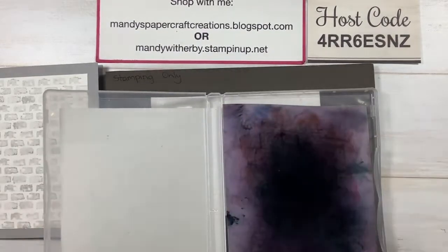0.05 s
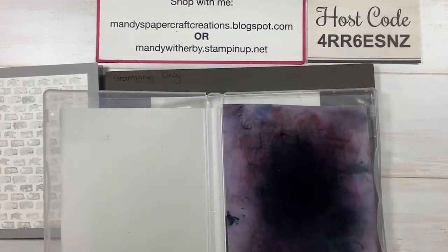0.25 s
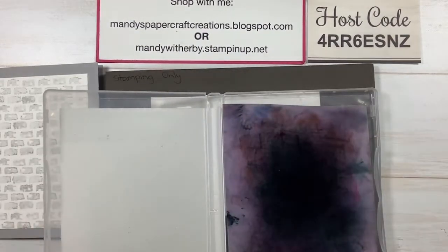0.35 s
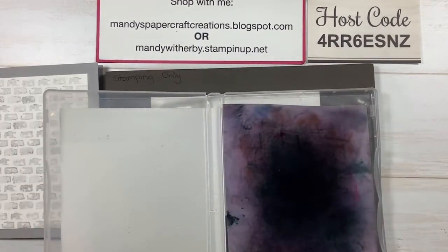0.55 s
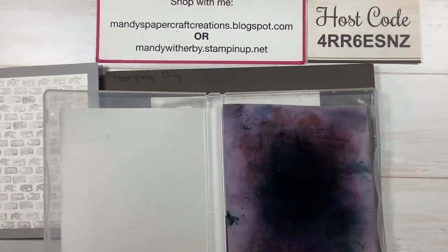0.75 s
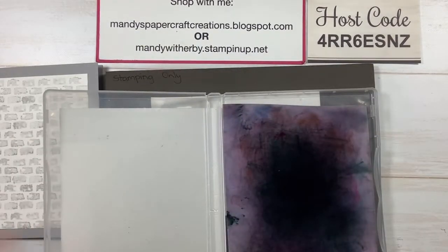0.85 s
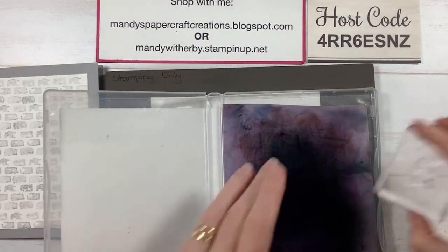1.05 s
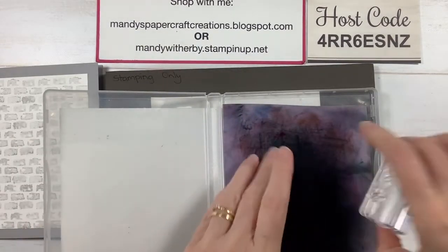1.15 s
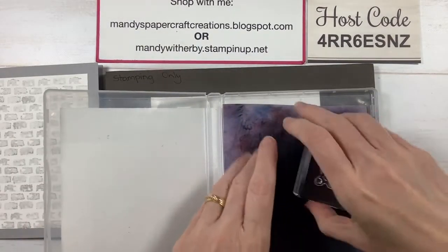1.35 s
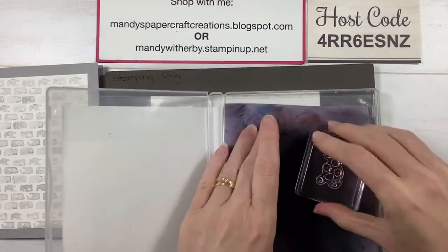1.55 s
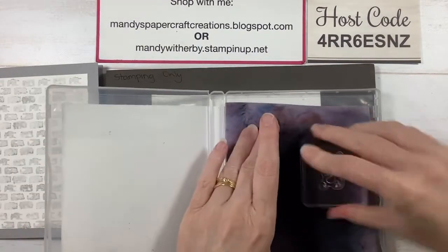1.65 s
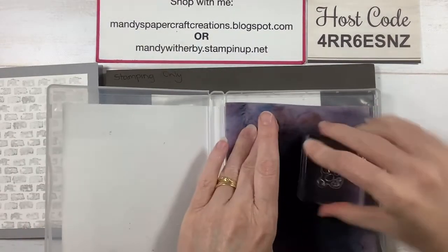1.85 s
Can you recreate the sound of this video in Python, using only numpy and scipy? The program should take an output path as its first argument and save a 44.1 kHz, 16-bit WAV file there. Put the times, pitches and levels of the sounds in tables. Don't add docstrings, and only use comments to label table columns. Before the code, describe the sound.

A hard plastic block clacks down on a paper-covered desk: a light tap, a loud quick double clack, then a soft padded thump. Faint handling ticks follow in a small, quiet room, heard close over low hum.

```python
import sys
import numpy as np
from scipy import signal
from scipy.fft import rfft, irfft
from scipy.io import wavfile
from scipy.ndimage import uniform_filter1d

SR = 44100
rng = np.random.default_rng(int(sys.argv[2]) if len(sys.argv) > 2 else 0)


def digitize_waveform(pressure):
    field = np.atleast_2d(pressure).T
    bounded = np.clip(field, -1, 1)
    quanta = np.round(bounded * 32767).astype(np.int16)
    wavfile.write(sys.argv[1], SR, quanta)


def rack_gain(trim_db):
    fader = np.asarray(trim_db, float)
    return 10 ** (fader / 20)


N = 83790

# (time [s], clack level [dB], desk level [dB])
BLOCK_LANDINGS = [
    (0.3787, -12.5, -31.5),
    (0.3962, -6.5, -35),
]
# (time [s], clack level [dB], desk level [dB])
STAMP_LANDINGS = [
    (0.2137, -24, -31),
    (0.262, -36, -37),
]
# (time [s], push level [dB], desk level [dB])
PADDED_LANDINGS = [
    (0.279, -66, -53.5),
    (0.5169, -10, -26.5),
    (0.5667, -34.5, -39),
    (1.529, -72, -60.5),
]


def rms_one(x):
    return x / np.sqrt(np.mean(x ** 2) + 1e-20)


def band(x, low_hz, high_hz, order=2):
    edges_hz = [max(low_hz, 10), min(high_hz, 0.45 * SR)]
    return signal.sosfilt(signal.butter(order, edges_hz, "band", fs=SR, output="sos"), x)


def ring(clicks, hz, t60_s):
    r = rack_gain(-60 / (t60_s * SR))
    w = 2 * np.pi * hz / SR
    return signal.lfilter([0, np.sin(w)], [1, -2 * r * np.cos(w), r * r], clicks + 1e-18)


def strike(s, db, modes, spread_db):
    s, db = np.asarray(s), np.asarray(db)
    at = np.clip((s * SR).astype(int), 0, N - 1)
    chance = rng.standard_normal((len(s), len(modes)))
    out = np.zeros(N)
    for k, (hz, level_db, t60_s) in enumerate(modes):
        clicks = np.zeros(N)
        sign = (-1) ** k
        np.add.at(clicks, at, sign * rack_gain(db + level_db + spread_db * chance[:, k]))
        out += ring(clicks, hz, t60_s)
    return out


def burst(s, db, low_hz, high_hz, t60_s):
    t = np.arange(N) / SR - s
    decay = rack_gain(-60 * np.maximum(t, 0) / t60_s) * (t > 0)
    puff = band(rng.standard_normal(N) * decay, low_hz, high_hz, order=3)
    return rack_gain(db) * puff * np.sqrt(SR / 2 / (high_hz - low_hz))


def hum():
    # (frequency [Hz], density [dB per Hz])
    spectrum = [(12, -35), (20, -15), (144, -3.5), (191, -9), (519, -12.5), (788, -38.5), (857, -30.5),
                (11700, -46.5), (15500, -50.5)]
    # (centre [Hz], width [Hz], level [dB])
    drones = [(61.3, 22, -65), (121, 6.7, -67.5)]
    level_db, hiss_top_hz = -64, 14300
    hz = np.maximum(np.fft.rfftfreq(N, 1 / SR), 1)
    at_hz, density_db = np.transpose(spectrum)
    shape = rack_gain(np.interp(np.log(hz), np.log(at_hz), density_db)) / (1 + (hz / hiss_top_hz) ** 30)
    out = rack_gain(level_db) * rms_one(irfft(rfft(rng.standard_normal(N)) * shape, N))
    for centre_hz, width_hz, db in drones:
        shape = 1 / (1 + (2 * (hz - centre_hz) / width_hz) ** 2)
        out += rack_gain(db) * rms_one(irfft(rfft(rng.standard_normal(N)) * shape, N))
    return out


def room(x):
    # (frequency [Hz], t60 [s], level [dB])
    reverb = [(102.7, 0.15, -16.5), (402, 0.34, -14), (1200, 0.44, -15.5), (3000, 0.34, -16.5),
              (5500, 0.3, -14), (8000, 0.14, -16.5), (14000, .14, -26.5)]
    gap_s, build_s = 0.0043, 0.004
    t = np.arange(SR // 2) / SR
    at_hz, t60_s, db = np.transpose(reverb)
    edges_hz = 60 * 2 ** np.arange(0, 8.1, 0.5)
    tail = 0
    for low_hz, high_hz in zip(edges_hz, edges_hz[1:]):
        place = np.log(low_hz * high_hz) / 2
        start_db = np.interp(place, np.log(at_hz), db)
        gain_db = start_db - 60 * t / np.interp(place, np.log(at_hz), t60_s)
        tail = tail + rack_gain(gain_db) * band(rng.standard_normal(len(t)), low_hz, high_hz)
    tail = tail * np.clip((t - gap_s) / build_s, 0, 1) * rack_gain(-20.0)
    return signal.fftconvolve(x, tail)[:N]


def brushes():
    # (time [s], length [s], level [dB], centre [Hz], width [octaves])
    strokes = [(0.0, 0.2, -67.5, 295, 0.86), (0.725, 0.089, -69, 330, .6), (0.757, 0.046, -69.5, 2200, 2.1),
               (.74, 0.2, -64.5, 125, 0.21), (0.388, .022, -73, 13500, 0.46),
               (1.754, 0.023, -87, 15390, .06), (0.75, 0.017, -73.5, 11440, 0.78),
               (0.751, 0.012, -56, 3700, 1.32), (0.753, 0.036, -61.5, 1200, 0.74),
               (0.763, 0.045, -75, 3180, 0.47), (0.815, 0.067, -81.5, 1226, 0.14),
               (1.006, 0.063, -81.5, 14000, .4), (1.324, 0.41, -79.5, 800, 0.8),
               (1.464, 0.26, -60, 132.5, 0.09), (1.52, 0.063, -69.5, 1760, 0.98),
               (1.59, 0.029, -66.5, 2813, 1.26), (1.631, 0.033, -72.5, 1500, 1.5),
               (1.666, 0.016, -74.5, 3550, 1.1), (1.709, 0.044, -68.5, 1044, 0.46),
               (1.729, 0.0097, -62, 1450, 0.23), (1.756, 0.034, -75.5, 5500, 0.6),
               (1.789, 0.037, -67.5, 3000, 0.67), (1.859, 0.013, -63, 1390, 0.37),
               (1.881, .02, -59.5, 1150, 0.74)]
    rise_s, fall_s, grain_db = 0.0046, 0.0094, 2.5
    t, out = np.arange(N) / SR, np.zeros(N)
    for s, length_s, db, hz, octaves in strokes:
        roughness = np.minimum(rng.exponential(1, N // 40 + 1), 3)
        grains = rng.standard_normal(N) * rack_gain(grain_db * np.repeat(roughness, 40)[:N])
        stroke = np.clip((t - s) / rise_s, 0, 1) * np.exp(-np.maximum(t - s - length_s, 0) / fall_s)
        half = 2 ** (octaves / 2)
        out += rack_gain(db) * stroke * rms_one(band(grains, hz / half, hz * half))
    return out


def squeak():
    # (time [s], pitch [Hz], level [dB])
    glide = [
        (1.864, 825, -71),
        (1.876, 800, -53.5),
        (1.89, 708.5, -55),
        (1.895, 736, -55),
        (1.9, 690, -68),
    ]
    s, hz, db = np.transpose(glide)
    t = np.arange(N) / SR
    wobble = rms_one(uniform_filter1d(rng.standard_normal(N), size=120))
    phase = 2 * np.pi * np.cumsum(np.interp(t, s, hz) * (1 + 0.047 * wobble)) / SR
    tone = np.sin(phase) + 0.81 * np.sin(2 * phase) + 0.21 * np.sin(3 * phase)
    return rack_gain(np.interp(t, s, db, left=-200)) * tone


def jingle():
    # (time [s], level [dB])
    touches = [
        (1.004, -79),
        (1.014, -67.5),
        (1.022, -72.5),
        (1.028, -74.5),
        (1.05, -73.5),
    ]
    # (frequency [Hz], level [dB], t60 [s])
    ring_modes = [(4830, -3, 0.023), (5340, -3, 0.023), (6470, -4, 0.014), (9830, -4.5, 0.025),
                  (10900, -3.5, 0.06), (12200, -1, 0.028), (13500, -9.5, 0.021), (14900, -16, .05),
                  (15500, -0.5, .09)]
    return band(strike(*np.transpose(touches), ring_modes, 2.4), 3500, 15700)


def nails():
    # (time [s], level [dB], lowest [Hz], highest [Hz], t60 [s])
    ticks = [(0.3959, -30, 2400, 6340, 0.01), (0.7582, -59, 2400, 4060, 0.02),
             (1.1413, -62.5, 1300, 3850, 0.021), (1.14, -64, 5800, 8430, 0.016),
             (1.262, -73, 2520, 6030, 0.015), (1.5293, -68, 860, 2400, .02), (1.5464, -67, 1580, 2600, .02),
             (1.5977, -66, 1000, 14000, 0.0062), (1.61, -69, 2546, 9050, 0.017),
             (1.64, -75, 3000, 13000, .01), (1.65, -67.5, 800, 2400, 0.016),
             (1.665, -67, 3200, 3470, 0.068), (1.663, -62.5, 3000, 8600, 0.0074),
             (1.736, -63, 900, 1910, 0.011), (1.7414, -56.5, 1000, 1850, 0.014),
             (1.785, -57, 3240, 9960, 0.005)]
    # (time [s], level [dB])
    snaps = [
        (1.784, -40.5),
    ]
    # (frequency [Hz], level [dB], t60 [s])
    snap_modes = [(1477, -3.5, 0.014), (1700, -6, 0.028), (2050, 2, 0.004), (2440, -0.5, 0.014),
                  (2760, -0.5, 0.0047), (3260, -6.5, 0.013), (3700, -11, 0.0083), (4650, -5, 0.0025)]
    return sum(burst(*row) for row in ticks) + strike(*np.transpose(snaps), snap_modes, 0)


def tray_knocks():
    # (time [s], peak level [dB])
    knocks = [(.005, -52.5), (.084, -50), (.143, -49.5), (.977, -47.5), (1.015, -47.5), (1.057, -47.5),
              (1.125, -45), (1.19, -60.5), (1.811, -49.5), (1.815, -50), (1.827, -50), (1.854, -47)]
    # (frequency [Hz], level [dB], t60 [s])
    tray_modes = [(308, -5, 0.034), (410, 8.5, 0.0066), (575.6, 5.5, 0.021), (760, 1, 0.015),
                  (1180, -13.5, 0.014)]
    s, peak_db = np.transpose(knocks)
    return band(strike(s, peak_db - 4, tray_modes, 1.5), 180, 1500)


def pushes():
    s, db, _ = np.transpose(PADDED_LANDINGS)
    modes = [(578, 0, 0.0079), (840, -22, 0.05), (1100, -18, 0.012), (1350, -20, 0.025)]
    return band(-strike(s, db, modes, 0), 150, 2600)


def desk():
    # (frequency [Hz], level [dB], t60 [s])
    desk_modes = [(125, -3.5, 0.11), (205, -10, .028), (268, -13, 0.14), (330, -11, 0.17), (410, -14.5, .1),
                  (573, -14, .04), (732, -23, .08), (843.7, -11, 0.1), (953, -16.5, .1), (1200, -21.5, .04)]
    # (time [s], level [dB])
    rocks = [
        (0.2167, -38.5),
        (.229, -33),
        (0.263, -41.5),
        (.281, -39),
        (.295, -48),
        (0.523, -31.5),
        (.533, -36),
        (1.529, -59),
    ]
    # (frequency [Hz], level [dB], t60 [s])
    hollow_modes = [(242, -2.5, 0.069), (276.7, -0.5, 0.18), (331.9, -3.5, .1), (376, -7, 0.1)]
    lag_s, rumble_db, rumble_t60_s = 0.0024, -9, 0.15
    s, _, db = np.transpose(BLOCK_LANDINGS + STAMP_LANDINGS + PADDED_LANDINGS)
    boom = strike(s + lag_s, db, desk_modes, 1.5)
    for hit_s, hit_db in zip(s, db):
        boom = boom + burst(hit_s + lag_s, hit_db + rumble_db, 200, 700, rumble_t60_s)
    boom = boom + strike(*np.transpose(rocks), hollow_modes, 0)
    return band(boom, 85, 1450, order=4)


def spread(landings, colour):
    clicks = np.zeros(N)
    for s, db, _ in landings:
        clicks[int(s * SR)] = rack_gain(db + 22.5)
    at_hz, db = np.transpose(colour)
    hz = np.maximum(np.fft.rfftfreq(N, 1 / SR), 1)
    return irfft(rfft(clicks) * rack_gain(np.interp(np.log(hz), np.log(at_hz), db)), N)


def clack_spread():
    # (frequency [Hz], level [dB])
    block_colour = [(300, -7.5), (700, -6.5), (1300, 1), (2400, 2), (3600, -4), (5500, -19.5),
                    (8000, -23.5), (12000, -46.5)]
    # (frequency [Hz], level [dB])
    stamp_colour = [(300, -12.5), (700, -0.5), (1500, 1), (2400, -3), (4000, -7.5), (6500, -15),
                    (8500, -23.5), (12000, -33.5)]
    return spread(BLOCK_LANDINGS, block_colour) + spread(STAMP_LANDINGS, stamp_colour)


def clack(contacts, modes):
    s, db, bright_db = np.transpose(contacts)
    split_hz, spread_db = 2900, 1.5
    high = [mode for mode in modes if mode[0] > split_hz]
    low = [mode for mode in modes if mode[0] <= split_hz]
    return band(strike(s, db, low, spread_db) + strike(s, db + bright_db, high, spread_db), 190, 9800)


def clacks():
    # (time [s], level [dB], extra brightness [dB])
    first_edge = [
        (.3793, -27.5, 6.5),
        (.3802, -21, 0.5),
        (.38105, -17, -5.5),
        (.3819, -18, -10),
        (.3845, -19.5, -12),
        (.3921, -29, -8),
    ]
    # (time [s], level [dB], extra brightness [dB])
    second_edge = [
        (.3961, -25.5, 13),
        (.3972, -22, -2),
        (.3984, -18, -1.5),
        (.3998, -18, -6.5),
        (.4016, -17, -10),
        (.4026, -17, -8),
        (.4053, -24.5, -12),
        (.4335, -31, -16.5),
    ]
    # (time [s], level [dB], extra brightness [dB])
    stamp_edge = [
        (.2137, -35, -0.5),
        (.2148, -34, 0),
        (.2163, -31.5, 0),
        (.2178, -35, -9.5),
        (.2212, -38.5, -3),
        (.263, -43.5, 1),
        (.2645, -36.5, -1),
        (.2662, -37.5, -3.5),
    ]
    # (frequency [Hz], level [dB], t60 [s])
    block_modes = [(530.3, -17.5, 0.028), (688, -5, 0.037), (1020, -10, 0.014), (1260, -7.5, 0.056),
                   (1390, -7.5, 0.023), (1738, -13.5, 0.027), (1990, -8, .025), (2455, 0.5, 0.0067),
                   (2608, -9, 0.03), (3200, -3, 0.022), (4215, -8.5, 0.004), (5300, -25, .005),
                   (6980, -27, 0.0097), (9600, -37, .004)]
    # (frequency [Hz], level [dB], t60 [s])
    turned_modes = [(560, -1, 0.023), (688, -8, 0.015), (1000, -6, .016), (1271, -8, 0.028),
                    (1450, -10, .02), (1972, -3, 0.026), (2300, -4, .008), (2700, -8, .015),
                    (3320, -2, .01), (4400, -11, .006), (5500, -17, .005), (7200, -25, 0.017),
                    (9400, -35.5, .004)]
    # (frequency [Hz], level [dB], t60 [s])
    stamp_modes = [(586, -5.5, 0.0039), (823, -3.5, 0.018), (1060, -13, 0.019), (1520, 1, 0.039),
                   (2070, -5.5, 0.01), (2400, -9, 0.019), (3000, -13.5, 0.007), (4107, -17, 0.01),
                   (5545, -11.5, .007), (7000, -16.5, 0.0066), (9227, -29, 0.006)]
    out = clack(first_edge, block_modes) + clack(second_edge, turned_modes) + clack(stamp_edge, stamp_modes)
    crack_db = -10.5
    for s, db, _ in BLOCK_LANDINGS + STAMP_LANDINGS:
        out = out + burst(s, db + crack_db, 800, 3900, 0.023)
    return out


def scene():
    small = brushes() + squeak() + nails() + jingle()
    tray, push, boom, edges = tray_knocks(), pushes(), desk(), clacks()
    send = clack_spread() + rack_gain(-18) * edges
    send = send + rack_gain(-3) * small + rack_gain(-8.5) * boom + rack_gain(-9.5) * push + rack_gain(5.5) * tray
    return (edges + small + boom + push + tray + room(send) + hum())[None]


def roll_off(x):
    return signal.sosfilt(signal.butter(12, 15740, fs=SR, output="sos"), x)


def record(dry):
    mix = signal.sosfilt(signal.butter(2, 43.4, "high", fs=SR, output="sos"), dry)
    return roll_off(mix)


dry = scene()
out = record(dry)
digitize_waveform(out)
```